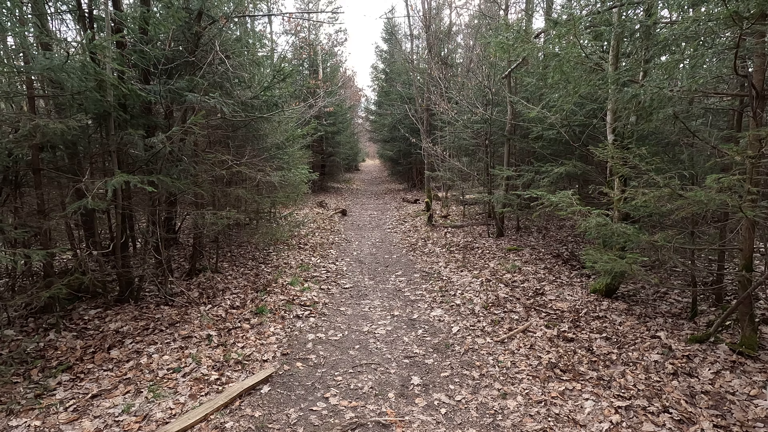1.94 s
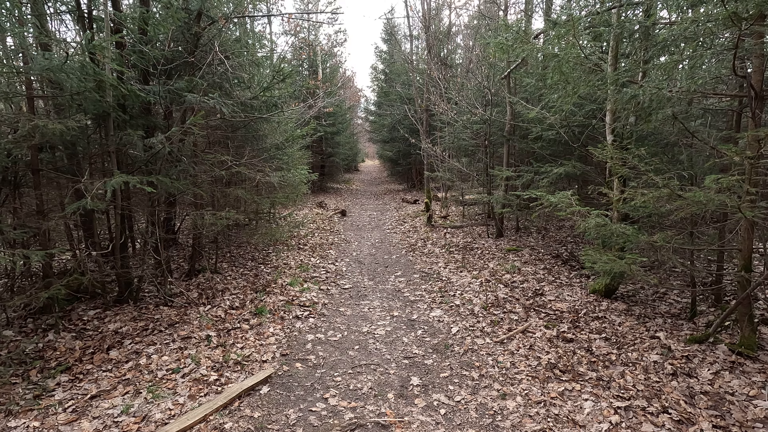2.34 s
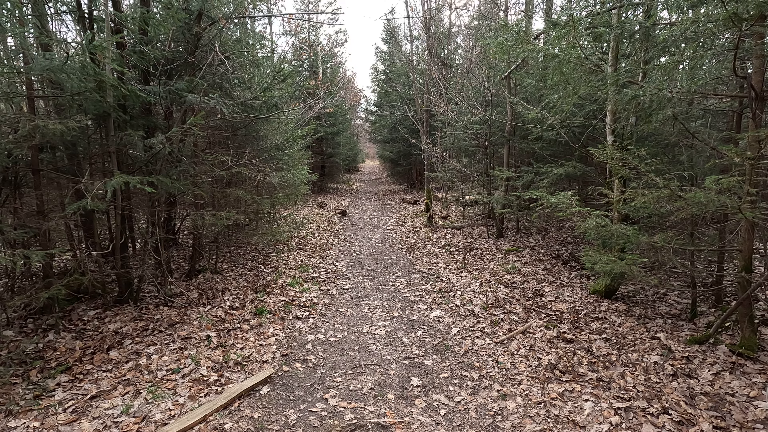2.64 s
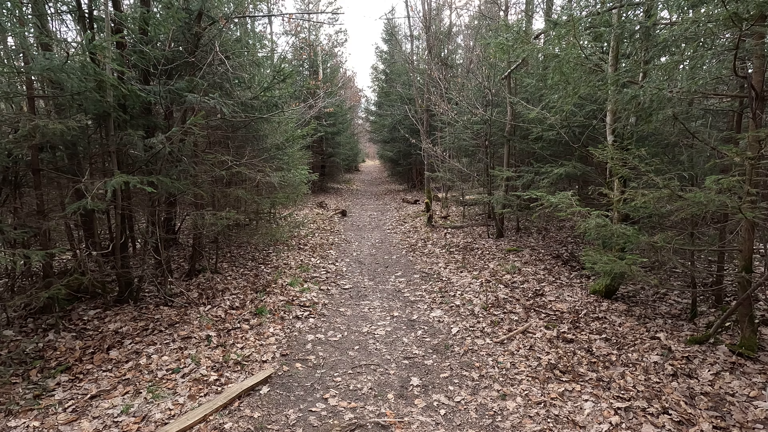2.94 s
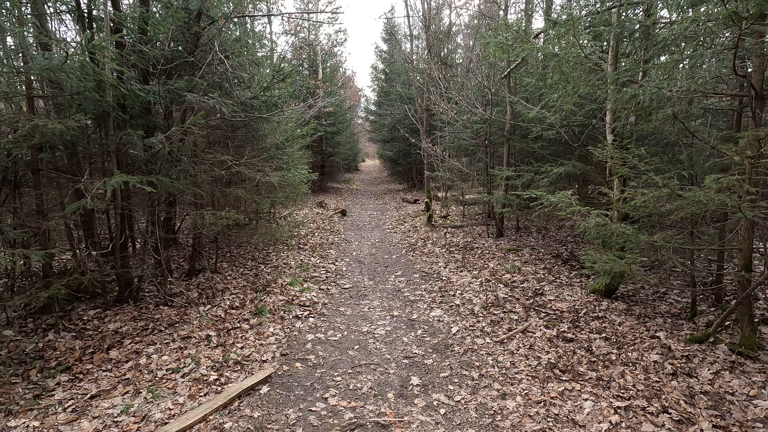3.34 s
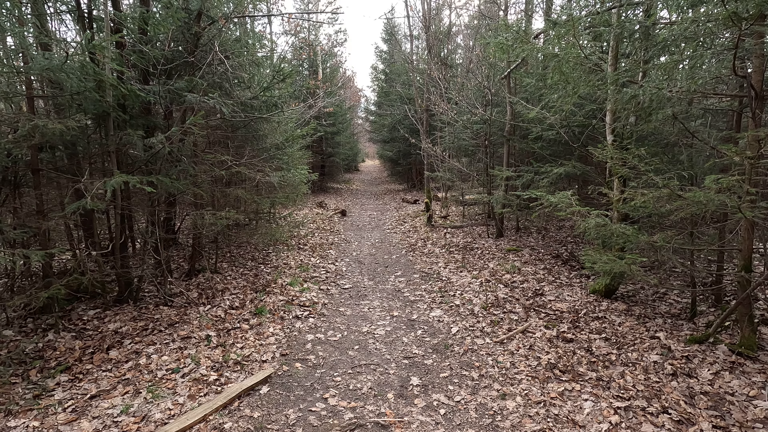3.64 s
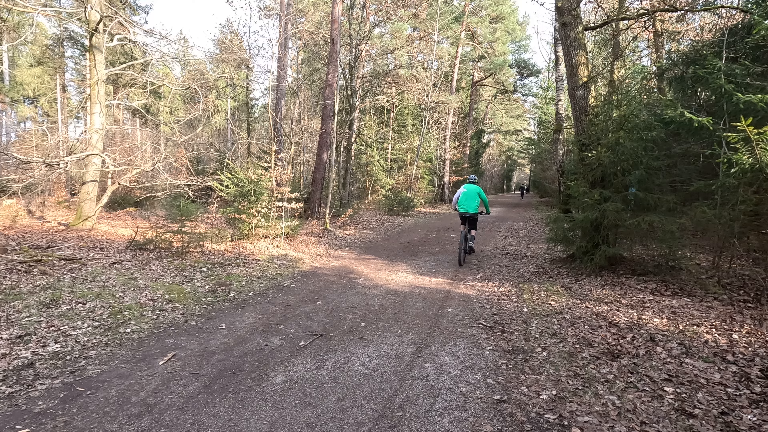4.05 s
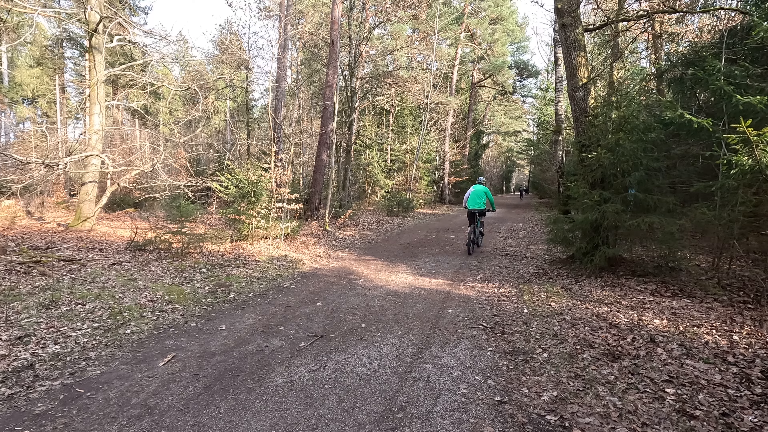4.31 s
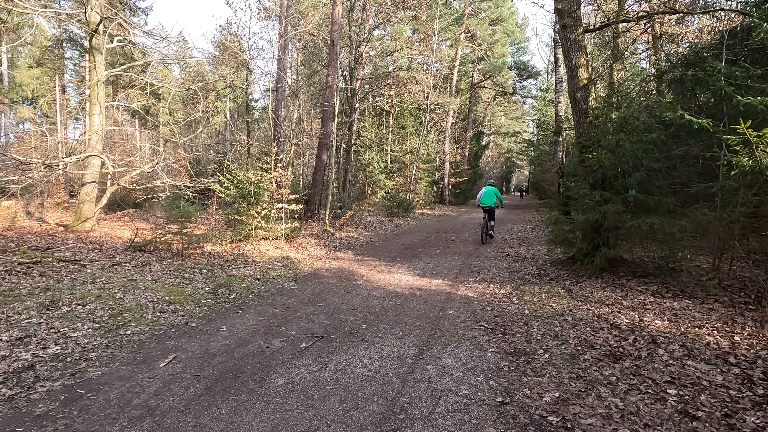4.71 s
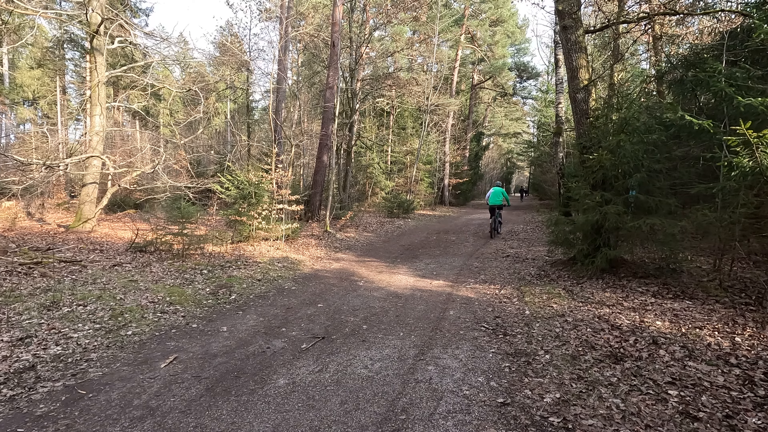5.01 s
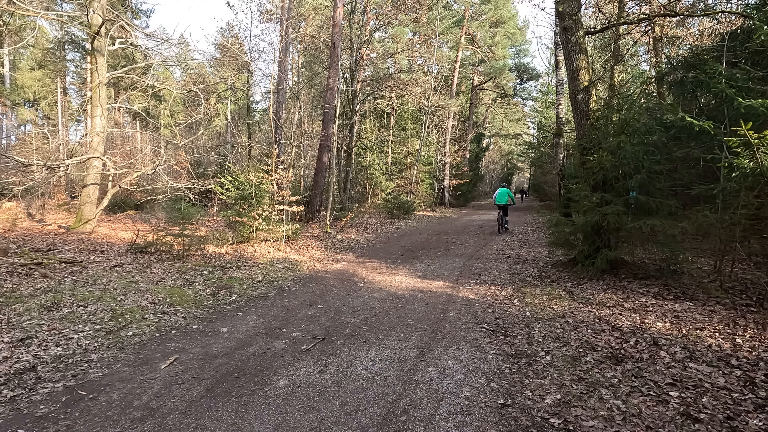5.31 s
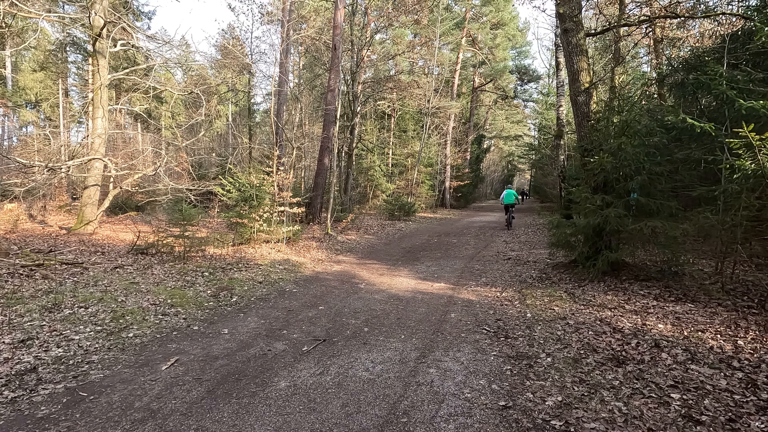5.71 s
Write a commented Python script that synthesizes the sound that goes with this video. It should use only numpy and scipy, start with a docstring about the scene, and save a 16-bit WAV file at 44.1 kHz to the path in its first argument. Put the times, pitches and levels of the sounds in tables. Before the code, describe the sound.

A small bird chirps close by and others whistle deeper in the woods, then a bicycle rolls away over crunching gravel.

```python
"""A small bird chips and slurs close by in a conifer wood; others whistle deeper in, over a faint rumble.
Each note is a gliding sine, scattered by the trunks into a diffuse tail. A thrush ends the first scene.
After a moment of silence, another forest track: a bicycle rides away over gravel. Stones drum on its
hollow tyres, pebbles snap aside and grit hisses; the rolling fades with distance."""
import sys
import numpy as np
from scipy import signal
from scipy.fft import rfft, irfft, next_fast_len
from scipy.io import wavfile
from scipy.ndimage import map_coordinates

SR = 44100
rng = np.random.default_rng(int(sys.argv[2]) if len(sys.argv) > 2 else 0)


def generate_wav(sig):
    """Save sig (samples, or channels by samples) to the path in sys.argv[1] as 16-bit PCM at SR."""
    pcm = np.round(np.clip(np.atleast_2d(sig).T, -1, 1) * 32767).astype(np.int16)
    wavfile.write(sys.argv[1], SR, pcm)


N = 258867

# Background spectra: (frequency [Hz], gain [dB])
RUMBLE_SPECTRUM = [(90, -35), (125, -13.5), (160, -0.5), (190, 2), (250, -3), (320, -19), (450, -34.5)]
HUM_SPECTRUM = [(220, -15), (310, 3.5), (420, 0), (530, -10.5), (650, -20.5), (900, -28)]
WIND_SPECTRUM = [(8.8, -37.5), (15, -4), (32, 4.5), (50, 1), (67, -4), (120, -19), (160, -57.5),
                 (260, -120)]
HUSH_SPECTRUM = [(400, 5.5), (750, -5), (1100, 3.5), (1700, 3), (2400, -2), (3200, -18), (5000, -43.5)]
MIC_HISS_SPECTRUM = [(2500, -4.5), (4500, 0), (7400, -0.5), (8700, -11), (10500, -16.5), (12000, -15),
                     (14000, -20)]
HISS_BURST_SPECTRUM = [(1500, 3), (3000, -2), (5500, 5), (7500, -26), (9000, -19), (14000, -34)]
# Distant drone: (time [s], rumble level [dB], hum level [dB], hum pitch [ratio])
DRONE_CURVES = [(0, -59.5, -63, 1.17), (.85, -53.5, -60, 0.88), (1.35, -57, -70, 0.96),
                (2.5, -51, -72, 0.97), (3.6, -58.5, -69.5, 1), (4.05, -57, -74, 0.92)]
# Hush of the trees: (time [s], level [dB])
HUSH_CURVE = [(0, -78.5), (.55, -80.5), (.85, -75), (4.05, -72.5)]
# Faint bursts of hiss: (time [s], length [s], level [dB])
HISS_BURSTS = [(0.619, 0.16, -57.5), (1.187, 0.1, -62), (2.732, 0.15, -64.5)]
# Decay among the trunks: (frequency [Hz], T60 [s])
TREE_DECAY = [(500, 1), (2500, 0.7), (5000, 0.74), (9000, 0.37)]
# Wind gusts, coarser gravel, thrown grit: (time [s], half-width [s], rise [dB])
WIND_GUSTS = [(1.335, 0.099, 13.5), (3.3, 0.37, 2), (4.42, 0.23, 4.5)]
ROUGH_PATCHES = [(4.29, 0.043, -1.5), (4.392, 0.0079, 5), (4.635, 0.027, 5), (4.76, 0.072, 4),
                 (5.03, 0.034, 3.5), (5.145, 0.023, 4.5), (5.629, 0.016, 7.5)]
GRIT_SPRAYS = [(4.35, 0.08, 3), (5.63, 0.025, 6.5)]

# Far song: (time [s], length [s], start pitch [Hz], end pitch [Hz], quaver [ratio], level [dB])
WOOD_PHRASES = [(.88, 0.17, 2020, 2007, 0.034, -69.5), (1.135, 0.15, 2560, 2660, 0.07, -65),
                (1.22, 0.22, 2720, 2620, 0.055, -67.5), (1.455, 0.2, 2190, 2060, 0.04, -64.5),
                (1.679, 0.16, 2125, 2035, 0.02, -76), (1.70, 0.11, 8200, 7700, 0.021, -90),
                (1.9, 0.19, 1710, 1642, 0.1, -73), (2.079, 0.07, 1706, 1800, 0.09, -64),
                (2.231, 0.25, 2174, 2360, 0.0363, -69), (2.356, 0.17, 2490, 2357, 0.042, -78),
                (2.41, 0.11, 6920, 6060, 0.028, -79), (2.625, 0.27, 6660, 6180, 0.067, -85),
                (2.80, 0.2, 2520, 2550, 0.015, -75), (3.059, 0.15, 1908, 1850, 0.03, -68.5),
                (3.25, 0.217, 1848, 1790, 0.055, -66.5), (3.47, 0.29, 1878, 2167, 0.081, -63.5),
                (3.50, 0.15, 2640, 2700, 0.06, -67), (3.56, .46, 2880, 3000, .08, -73.5),
                (3.87, .13, 5120, 5000, .015, -73), (3.655, 0.09, 2440, 2560, 0.04, -62),
                (3.735, 0.07, 2600, 2760, 0.05, -60), (3.93, 0.08, 4510, 4680, 0.17, -71.5),
                (1.93, .17, 490, 545, .12, -70), (2.14, .06, 680, 780, .08, -74)]
TRACK_PHRASES = [(4.85, 0.37, 3460, 3490, 0.014, -77.5), (5.10, 0.15, 2735, 2725, 0.028, -70.5),
                 (5.42, 0.24, 2720, 2750, 0.04, -71), (5.7, 0.14, 2710, 2730, 0.032, -68)]
# Whistles: (time [s], length [s], start pitch [Hz], end pitch [Hz], level [dB])
CLEAR_WHISTLES = [(.67, .22, 2000, 1965, -67), (.77, .125, 2680, 2680, -70), (.885, .19, 2690, 2665, -67),
                  (.84, .16, 4920, 4860, -76), (.885, .2, 2060, 2110, -66), (2.595, .2, 2020, 1955, -62),
                  (3.56, .11, 1970, 1950, -62), (3.755, .045, 3480, 3480, -75),
                  (3.945, .065, 4460, 4440, -75)]
SEESAW_WHISTLES = [(.79, .22, 5160, 5300, -69.5), (1.228, .19, 5160, 5390, -68.5),
                   (1.66, .2, 5185, 5280, -69.5)]
# Note shapes: (offset [s], pitch [ratio], level [dB])
WARBLE_SHAPE = [(0, 1.07, -10), (.014, 1.06, -3), (.024, .98, -1), (.036, .96, 2), (.043, 1.02, -3),
                (.049, 1.09, 0), (.06, .985, -5), (.085, 1.02, -2), (.11, .995, -13)]
DIP_SHAPE = [(0, .98, -4), (.018, .86, 0), (.04, .79, -3), (.085, .85, -4), (.105, .92, 5), (.13, 1.02, -3)]
CHIP_SHAPE = [(0, .59, -9), (.007, .77, -3), (.013, .95, -1.5), (.018, .99, 1), (.024, .98, -.5),
              (.030, .8, -2), (.036, .61, -10)]
CHIP_SECOND_VOICE = [(0, 1.02, -15), (.006, 1.05, -8), (.011, 1.16, -13)]
# Onsets of shaped notes: (time [s], pitch [Hz], level [dB])
WARBLE_ONSETS = [(2.5, 7770, -69), (2.681, 8030, -68.5), (2.838, 7580, -68)]
CHIP_ONSETS = [(.038, 3860, -45), (.098, 3800, -44), (.16, 3880, -44.5)]
# Note contours, one list per note: (time [s], pitch [Hz], level [dB])
FLOURISH_NOTES = [
    [(2.333, 7630, -84), (2.358, 7530, -72), (2.368, 8100, -80), (2.38, 7900, -84), (2.394, 8200, -71.5),
     (2.412, 8500, -81)],
    [(2.564, 7930, -78), (2.573, 8720, -64), (2.586, 8900, -73), (2.595, 8210, -67), (2.606, 8300, -71),
     (2.614, 8600, -67), (2.622, 8200, -80)],
]
THRUSH_NOTES = [
    [(3.655, 2300, -64), (3.69, 2190, -57), (3.72, 2145, -55), (3.79, 2135, -54), (3.825, 2090, -52),
     (3.89, 2070, -54), (3.912, 2065, -65)],
    [(3.938, 2300, -60), (3.955, 2280, -54), (3.987, 2255, -51), (4.0, 2170, -49), (4.07, 2135, -50)],
]
HOARSE_NOTES = [
    [(0, 5200, -54), (.014, 5100, -58), (.022, 4650, -64), (.12, 4700, -72), (.2, 4650, -76)],
]
SLUR_NOTES = [
    [(0, 3200, -33.5), (.005, 2910, -49), (.011, 2320, -42)],
    [(.283, 3680, -43), (.286, 5200, -64), (.290, 6670, -63), (.302, 6870, -64), (.318, 7350, -68.5),
     (.335, 7730, -82)],
    [(.399, 5670, -77), (.407, 8490, -71), (.414, 7380, -73), (.422, 6290, -60), (.445, 5680, -65),
     (.465, 5560, -59), (.487, 5350, -53.5), (.494, 4780, -49), (.501, 3790, -59.5)],
]
# Radiation of the near bird's slurs: (frequency [Hz], gain [dB])
BEAK_SPECTRUM = [(2000, -11.5), (6000, 3.5), (7400, 14.5), (8100, -1.5), (9900, -13), (10900, 8.5),
                 (12000, 5.5), (13000, -30.5)]

# Rolling and impact spectra: (frequency [Hz], gain [dB])
TYRE_SPECTRUM = [(53, -49), (90, -19), (121, -2), (155, -6), (190, 0.5), (259, 1.5), (281, 0), (415, -18.5),
                 (450, -24.5), (580, -51.5), (990, -120)]
GRAVEL_SPECTRUM = [(150, -10), (300, -23), (420, -6), (540, 2.5), (700, 1), (900, -4.5), (1200, -13.5),
                   (1400, -9), (1650, -12.5), (1900, -32), (2700, -28), (4000, -51.5)]
GRIT_SPECTRUM = [(1200, 9.5), (2200, 7.5), (2700, 5.5), (3100, 1.5), (3500, 4.5), (3950, 0), (5000, -4),
                 (6300, -10), (7500, -14.5), (8500, -28), (10700, -23.5), (12500, -45), (15000, -43.5)]
KNOCK_SPECTRUM = [(200, -7), (400, 1), (560, 5.5), (720, 5.5), (1000, .5), (1250, -3.5), (1550, -1),
                  (1850, -11), (2100, -16), (3000, -32)]
SNAP_SPECTRUM = [(800, -3), (1600, 19), (4000, 13.5), (5800, 9.5), (7500, -15.5), (9000, -8),
                 (11000, -26.5), (15000, -29.5)]
TICK_SPECTRUM = [(3000, -1), (5000, 10), (7400, 8), (8600, -9.5), (10500, 1.5), (11800, -6.5), (13000, -15),
                 (14800, -23.5)]
# Single impacts: (time [s], level [dB])
STONE_KNOCKS = [(4.238, -32), (4.269, -29), (4.332, -30), (4.394, -28), (4.455, -32), (4.504, -30),
                (4.518, -29), (4.57, -25), (4.61, -31), (4.732, -27), (4.805, -29), (4.838, -32),
                (4.943, -33), (4.963, -32), (5.005, -33), (5.353, -37), (5.397, -34), (5.593, -36),
                (5.612, -29), (5.684, -35), (5.727, -35)]
PEBBLE_SNAPS = [(4.284, -29.5), (4.302, -40.5), (4.425, -41.5), (4.563, -49.5), (5.066, -49.5),
                (5.102, -54), (5.613, -47.5), (5.621, -52)]
GRIT_TICKS = [(4.51, -61), (4.708, -57.5), (4.956, -62), (5.102, -59), (5.133, -64), (5.215, -67),
              (5.281, -63.5), (5.372, -63), (5.498, -60.5), (5.613, -64), (5.621, -59.5), (5.667, -62.5),
              (5.744, -64.5)]
# Treble band mirrored upward: (frequency [Hz], gain [dB])
MIRROR_SPECTRUM = [(9800, -42.5), (10600, -8), (11400, -6.5), (12000, -4), (12400, -43)]

WOOD_END_S, RIDE_START_S, RIDE_FULL_S = 4.064, 4.172, 4.262
RECEDE_PER_S = .97  # rider's speed over his distance at RIDE_FULL_S
MIRROR_HZ, BAND_LIMIT_HZ = 12000, 14800


def amp(db):
    """Decibels to gain."""
    return 10 ** (np.asarray(db) / 20)


def unit(x):
    """Scale to rms 1."""
    return x / np.sqrt(np.mean(x ** 2) + 1e-20)


def log_interp(points, hz):
    """Interpolate on a log frequency axis."""
    knots_hz, values = np.transpose(points)
    return np.interp(np.log(hz + 1), np.log(knots_hz + 1), values)


def curves(rows):
    """One value per sample for each column after the time."""
    times_s, *columns = np.transpose(rows)
    return [np.interp(np.arange(N) / SR, times_s, column) for column in columns]


def wobble(rate_hz, count=N):
    """Smooth random curve."""
    knots = rng.standard_normal(int(count * rate_hz / SR) + 4)
    return map_coordinates(knots, [np.arange(count) * rate_hz / SR])


def swells_db(events):
    """Sum of bell-shaped level changes."""
    t = np.arange(N) / SR
    return sum(db * np.exp(-((t - at_s) / width_s) ** 2) for at_s, width_s, db in events)


def add(track, at_s, sound):
    """Mix a sound into a track."""
    start = int(np.clip(round(at_s * SR), 0, N - 1))
    track[start:start + len(sound)] += sound[:N - start]


def colour(x, spectrum):
    """Minimum-phase filter, falling steeply beyond the spectrum's ends."""
    size = 2 * next_fast_len(len(x) // 2 + SR // 8, real=True)
    closed = [(spectrum[0][0] / 2, -90), *spectrum, (spectrum[-1][0] * 2, -90)]
    cepstrum = irfft(np.log(amp(log_interp(closed, np.fft.rfftfreq(size, 1 / SR)))))
    cepstrum[1:size // 2] *= 2
    cepstrum[size // 2 + 1:] = 0
    return irfft(rfft(x, size) * np.exp(rfft(cepstrum)))[:len(x)]


def noise(spectrum):
    """Coloured noise of rms 1."""
    return unit(colour(rng.standard_normal(N), spectrum))


def spread(mid, side, side_db):
    """Mid and side to left and right."""
    return mid + amp(side_db) * np.array([side, -side])


def pan(x, left_db):
    """Lean a sound to one side."""
    return x * amp([[left_db / 2], [-left_db / 2]])


def trees(x, side_db):
    """Trunks scatter a sound into a diffuse tail."""
    hz, t, bins = signal.stft(rng.standard_normal((2, SR)), SR, nperseg=256)
    decay = amp(-60 * t / log_interp(TREE_DECAY, hz)[:, None])
    tail = signal.istft(bins * decay, SR, nperseg=256)[1]
    mid, side = signal.fftconvolve(x[None], tail / np.linalg.norm(tail[0]), axes=1)[:, :N]
    return spread(mid, side, side_db)


def woodland_air():
    """Distant rumble and drifting hum, the hush of trees, wind and hiss at the microphone."""
    rumble_db, hum_db, hum_ratio = curves(DRONE_CURVES)
    hush_db, = curves(HUSH_CURVE)
    wind_db = -58 + wobble(2.9) + swells_db(WIND_GUSTS)

    def bass():
        wind = amp(wind_db) * noise(WIND_SPECTRUM)
        rumble = amp(rumble_db) * noise(RUMBLE_SPECTRUM)
        hum = map_coordinates(noise(HUM_SPECTRUM), [np.cumsum(hum_ratio)], order=1, mode="mirror")
        return wind + rumble + amp(hum_db + 2) * hum

    low = pan(spread(bass(), bass(), side_db=-18.5), left_db=-.8)
    hush = amp(hush_db + 3.5) * spread(noise(HUSH_SPECTRUM), noise(HUSH_SPECTRUM), side_db=-6)
    hiss = amp(-84.5) * spread(noise(MIC_HISS_SPECTRUM), noise(MIC_HISS_SPECTRUM), side_db=-6.5)
    return low + hush + hiss


def hiss_bursts():
    """Short, faint, flickering bursts of hiss."""
    envelope = np.zeros(N)
    for at_s, length_s, db in HISS_BURSTS:
        add(envelope, at_s, amp(db) * signal.windows.tukey(int(length_s * SR), .7))
    bursts = envelope * amp(2.4 * wobble(170)) * noise(HISS_BURST_SPECTRUM)
    return amp(-13.5) * bursts + amp(-19) * trees(bursts, side_db=-2)


def track_wind():
    """Air buffets the microphone by the track."""
    return amp(-48.5 + wobble(7) + swells_db(WIND_GUSTS)) * noise(WIND_SPECTRUM)


def far_birds(phrases):
    """Quavering phrases, heard only as their scattered echo."""
    song = np.zeros(N)
    for at_s, length_s, start_hz, end_hz, quaver, db in phrases:
        count = int(length_s * SR)
        pitch_hz = np.linspace(start_hz, end_hz, count) * (1 + quaver * wobble(130, count))
        envelope = amp(db) * signal.windows.tukey(count, .29)
        add(song, at_s, envelope * np.sin(2 * np.pi * np.cumsum(pitch_hz) / SR))
    return amp(2.5) * trees(song, side_db=-7)


def sing(notes, octave_db, waver, waver_hz=120):
    """Each note is a gliding sine with a weak octave; waver is a share of the pitch."""
    song = np.zeros(N)
    for note in notes:
        times_s, hz, db = np.transpose(note)
        t = np.arange(times_s[0], max(times_s[-1], times_s[0] + .005), 1 / SR)
        pitch_hz = np.interp(t, times_s, hz) * (1 + waver * wobble(waver_hz, len(t)))
        phase = 2 * np.pi * np.cumsum(pitch_hz) / SR
        edges = np.clip(np.minimum(t - t[0], t[-1] - t) / .002, 0, 1)
        envelope = np.sqrt(2) * edges * amp(np.interp(t, times_s, db))
        add(song, times_s[0], envelope * (np.sin(phase) + amp(octave_db) * np.sin(2 * phase)))
    return song


def repeat(shape, onsets):
    """One note of the same shape at each onset."""
    return [[(at_s + offset_s, hz * ratio, db + rise_db) for offset_s, ratio, rise_db in shape]
            for at_s, hz, db in onsets]


def glide(at_s, length_s, start_hz, end_hz, db):
    """Contour of a straight glide that swells, holds and fades."""
    return [(at_s + share * length_s, start_hz + share * (end_hz - start_hz), db + rise_db)
            for share, rise_db in [(0, -12), (.21, 0), (.77, 0), (1, -12)]]


def whistle(rows, **voice):
    """Glides whose level flutters on the way through the trees."""
    flutter = amp(2 * wobble(31))
    return flutter * sing([glide(*row) for row in rows], **voice)


def whistling_bird():
    """Clear whistles from the nearer trees, with their echo."""
    song = whistle(CLEAR_WHISTLES, octave_db=-52, waver=.004)
    return pan(amp(-6.5) * song + amp(-10.5) * trees(song, side_db=-2), left_db=-1.5)


def seesaw_bird():
    """Two-note song: a high whistle, then a dipping slur heard only by way of the trees."""
    highs = whistle(SEESAW_WHISTLES, octave_db=-50, waver=.003, waver_hz=150)
    delay_s, dip_hz, dip_db = .225, 5200, -70.5
    onsets = [(at_s + delay_s, dip_hz, dip_db) for at_s, *_ in SEESAW_WHISTLES]
    dips = sing(repeat(DIP_SHAPE, onsets), octave_db=-52, waver=.07, waver_hz=700)
    return highs + trees(amp(-2) * highs + dips, side_db=-8)


def warbling_bird():
    """A thin warble overhead, with two rising flourishes."""
    song = sing(repeat(WARBLE_SHAPE, WARBLE_ONSETS) + FLOURISH_NOTES, octave_db=-63, waver=.0082)
    return pan(amp(-5) * song + amp(-8.5) * trees(song, side_db=-12), left_db=3.5)


def thrush():
    """Two fluted notes glide down, slightly to the right, and linger among the trunks."""
    song = sing(THRUSH_NOTES, octave_db=-45, waver=.007, waver_hz=150)
    return pan(amp(-3) * song + amp(-4.5) * trees(song, side_db=.5), left_db=-1)


def near_bird(reflection_s=.0072):
    """Three two-voiced chips, a hoarse note and slurs, all doubled by a strong reflection."""
    chips = sing(repeat(CHIP_SHAPE, CHIP_ONSETS), octave_db=-33, waver=.016, waver_hz=800)
    chips += sing(repeat(CHIP_SECOND_VOICE, CHIP_ONSETS), octave_db=-46, waver=.015, waver_hz=200)
    hoarse = sing(HOARSE_NOTES, octave_db=-34, waver=.055, waver_hz=1400)
    slurs = colour(sing(SLUR_NOTES, octave_db=-29, waver=.0038), BEAK_SPECTRUM)
    direct = amp(-1.5) * (chips + hoarse) + slurs
    reflected = np.pad(direct, (round(reflection_s * SR), 0))[:N]
    song = amp(-3.5) * direct + amp(2.35) * reflected
    return pan(song + amp(-9.5) * trees(song, side_db=-10.5), left_db=1.5)


def contacts(rate_hz, scatter_db):
    """Random impulses of tread on gravel, of varying force."""
    hits = rng.random(N) < rate_hz / SR
    return hits * rng.choice([-1, 1], N) * amp(scatter_db * np.clip(rng.standard_normal(N), -2, 2))


def impacts(events, spectrum, decay_s, scrape):
    """Each impact is a push and a short scrape, coloured by what it strikes."""
    track, t = np.zeros(N), np.arange(SR // 20) / SR
    for at_s, db in events:
        force = (t == 0) + scrape * rng.standard_normal(len(t)) * np.exp(-t / decay_s)
        sound = colour(force, spectrum)[:len(t)]
        add(track, at_s, amp(db) * sound / np.abs(sound).max())
    return track


def rolling_tyres():
    """Stones drum on the hollow tyres and crunch together, grit hisses; all fade with distance."""
    distance_ratio = 1 + RECEDE_PER_S * np.maximum(np.arange(N) / SR - RIDE_FULL_S, 0)
    roughness = amp(swells_db(ROUGH_PATCHES))
    force = unit(contacts(rate_hz=420, scatter_db=-1))
    drum = amp(-32) * unit(colour(force + .54 * rng.standard_normal(N), TYRE_SPECTRUM))
    crunch = amp(-42) * unit(unit(colour(force, GRAVEL_SPECTRUM)) + .56 * noise(GRAVEL_SPECTRUM))
    small_stones = amp(-51) * unit(colour(contacts(rate_hz=60, scatter_db=5.5), KNOCK_SPECTRUM))
    grit = amp(-54 + swells_db(GRIT_SPRAYS)) * unit(amp(1.1 * wobble(160)) * noise(GRIT_SPECTRUM))
    return (roughness * drum / distance_ratio ** 1.16
            + roughness * (crunch + small_stones) / distance_ratio ** 1.05
            + roughness ** .19 * grit / distance_ratio ** 1.25)


def bicycle():
    """The tyres roll, knock over stones, snap pebbles aside and fling grit that lands with a tick."""
    rolling = rolling_tyres()
    knocks = amp(-1.2) * impacts(STONE_KNOCKS, KNOCK_SPECTRUM, decay_s=.002, scrape=.06)
    snaps = impacts(PEBBLE_SNAPS, SNAP_SPECTRUM, decay_s=.0054, scrape=1.6)
    ticks = impacts(GRIT_TICKS, TICK_SPECTRUM, decay_s=.016, scrape=2.5)
    return rolling + knocks + snaps + ticks


def scene():
    """The wood stops abruptly; the track with the bicycle fades in, in mono."""
    t = np.arange(N) / SR
    fade_out = np.clip((WOOD_END_S - t) / .006, 0, 1)
    fade_in = np.clip((t - RIDE_START_S) / (RIDE_FULL_S - RIDE_START_S), 0, 1) ** 2.1
    birds = near_bird() + warbling_bird() + whistling_bird() + seesaw_bird() + thrush()
    wood = birds + far_birds(WOOD_PHRASES) + woodland_air() + hiss_bursts()
    track = bicycle() + track_wind() + far_birds(TRACK_PHRASES).mean(axis=0)
    return fade_out * wood + fade_in * track


def record(dry):
    """The camera faintly mirrors the top treble upward and keeps nothing above its band limit."""
    size = next_fast_len(N + SR // 2)
    hz, spectrum = np.fft.rfftfreq(size, 1 / SR), rfft(dry, size)
    treble = spectrum * amp(log_interp(MIRROR_SPECTRUM, hz)) * (hz > MIRROR_SPECTRUM[0][0])
    mirror_bins = np.clip(np.round((2 * MIRROR_HZ - hz) * size / SR).astype(int), 0, len(hz) - 1)
    mirrored = np.conj(treble[:, mirror_bins])
    return irfft((spectrum + mirrored) * (hz < BAND_LIMIT_HZ), size)[:, :N]


dry = scene()
out = record(dry)
generate_wav(out)
```